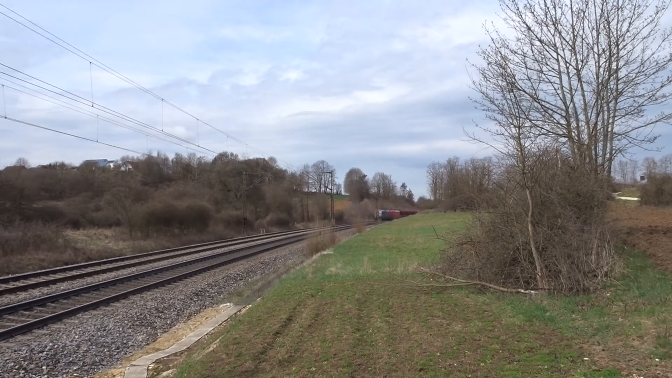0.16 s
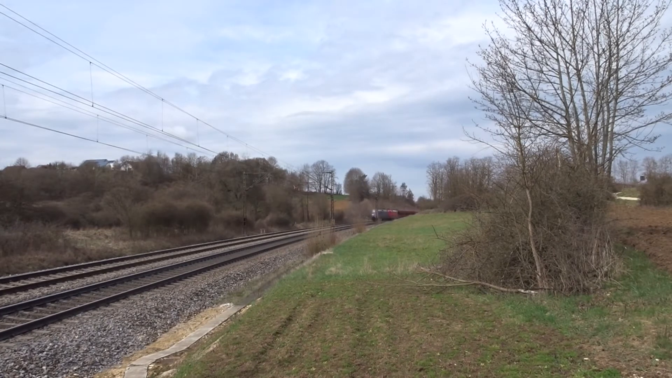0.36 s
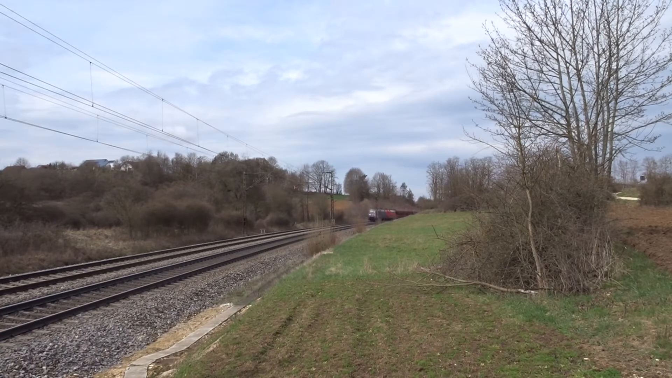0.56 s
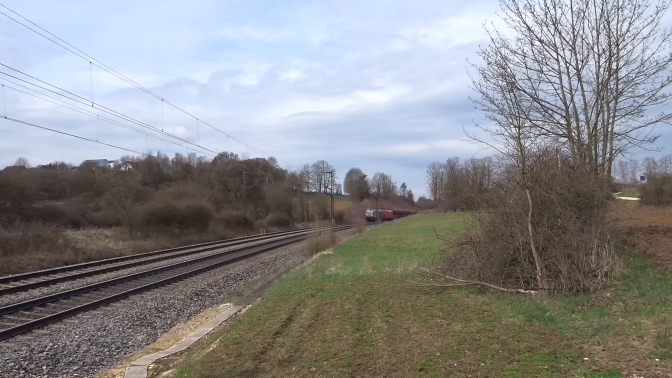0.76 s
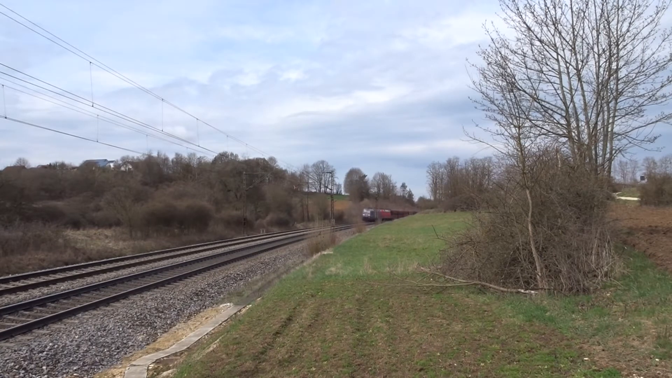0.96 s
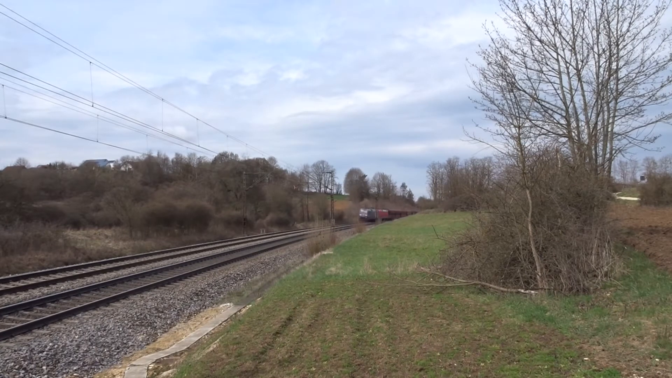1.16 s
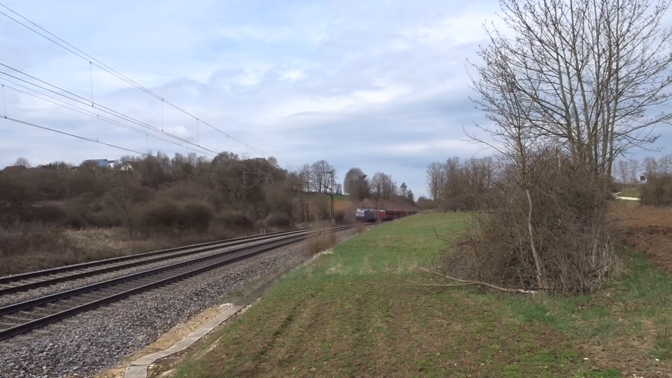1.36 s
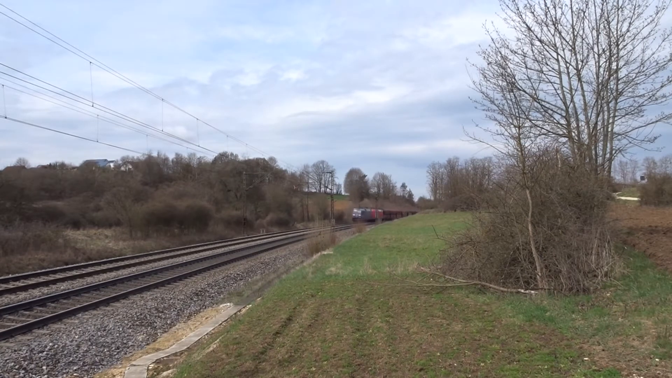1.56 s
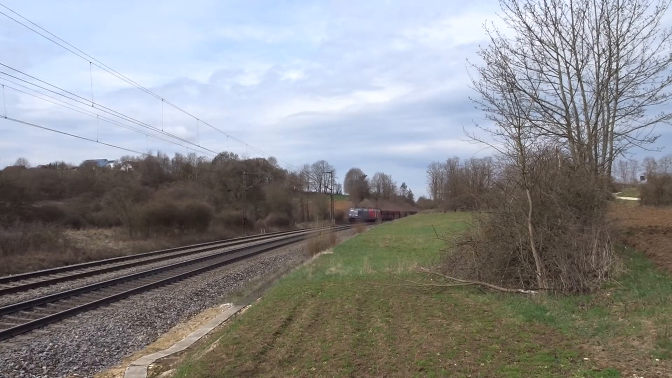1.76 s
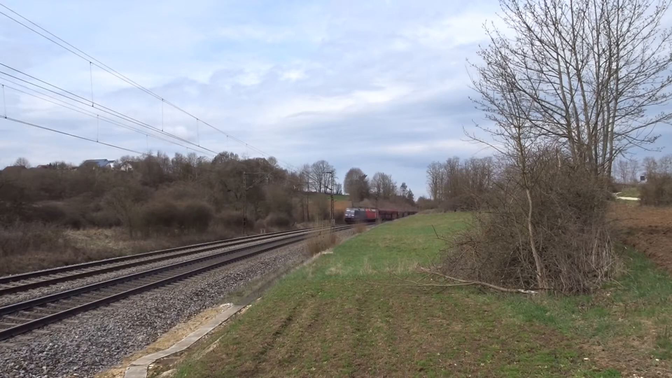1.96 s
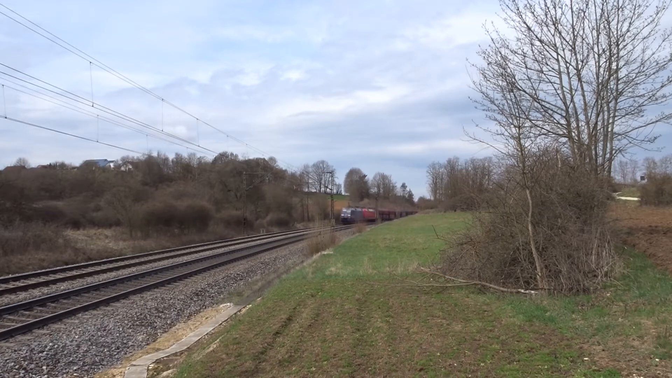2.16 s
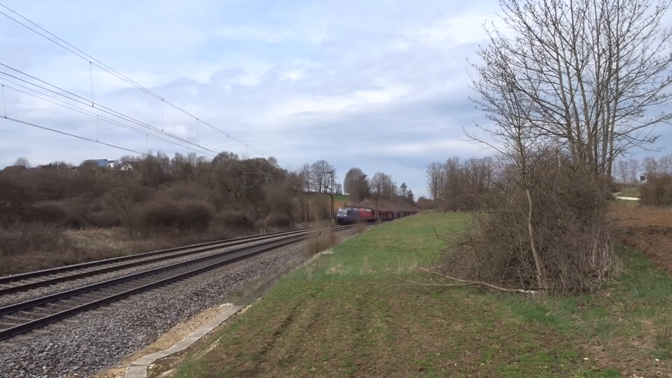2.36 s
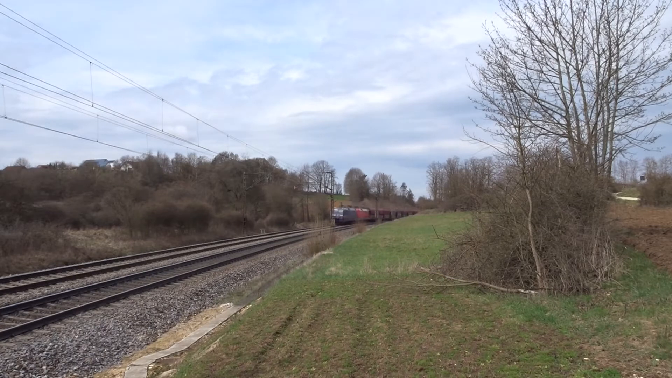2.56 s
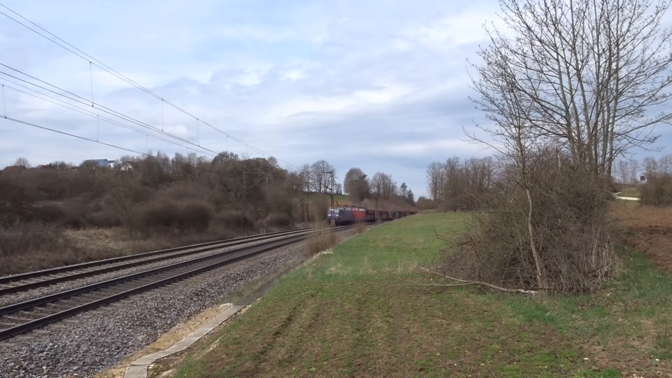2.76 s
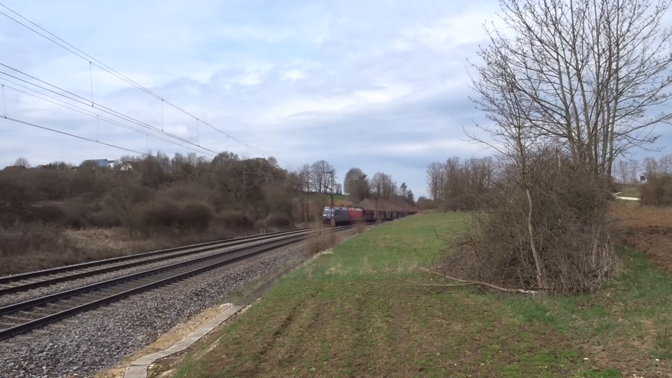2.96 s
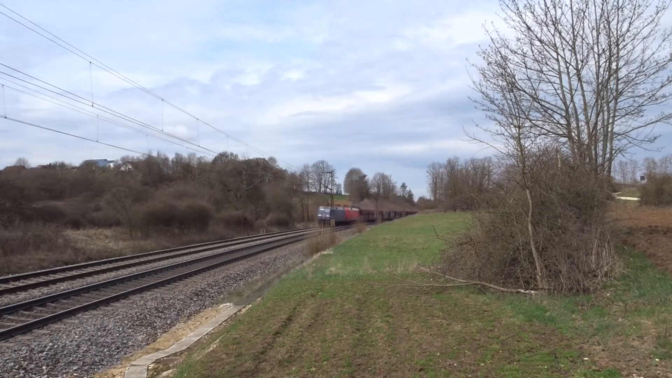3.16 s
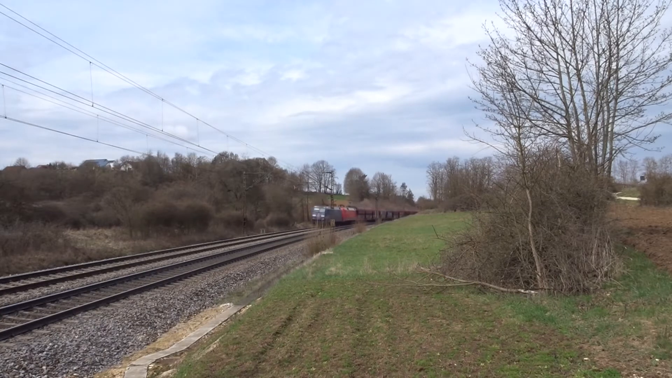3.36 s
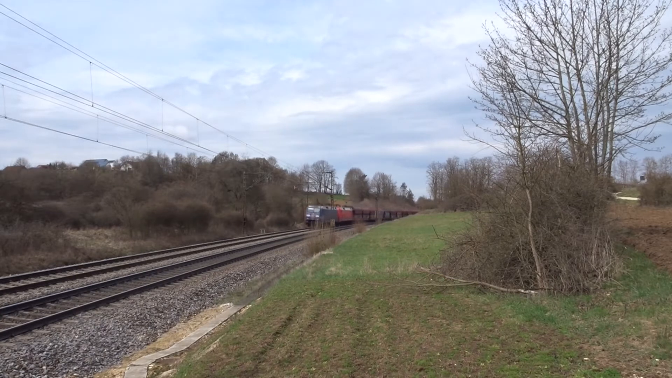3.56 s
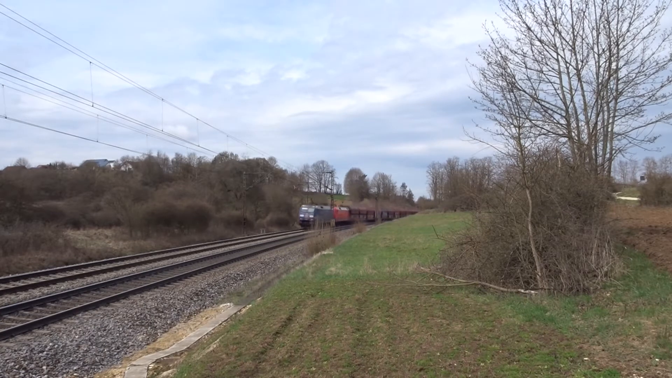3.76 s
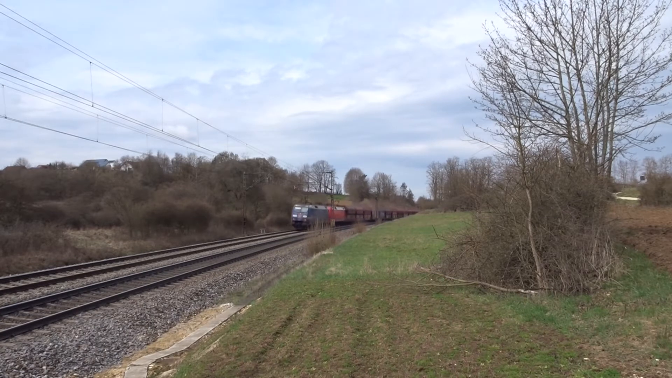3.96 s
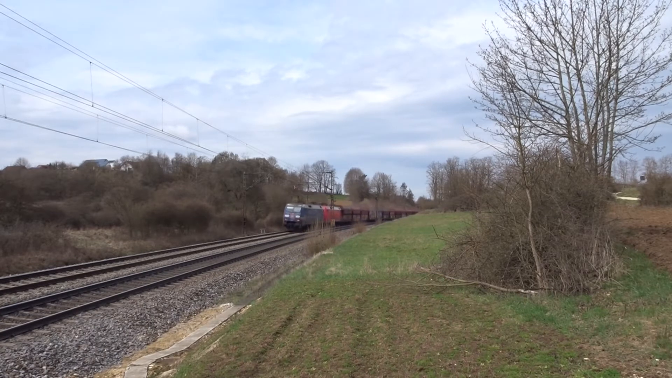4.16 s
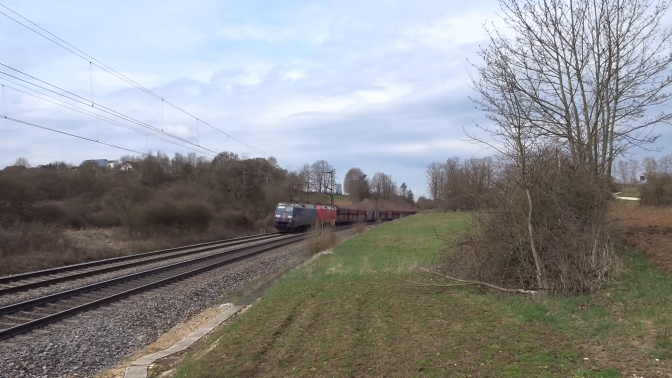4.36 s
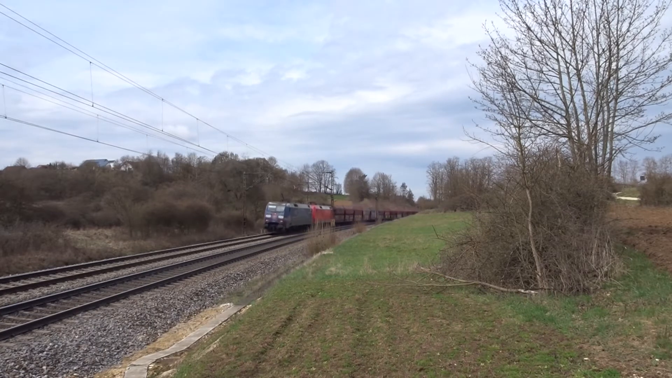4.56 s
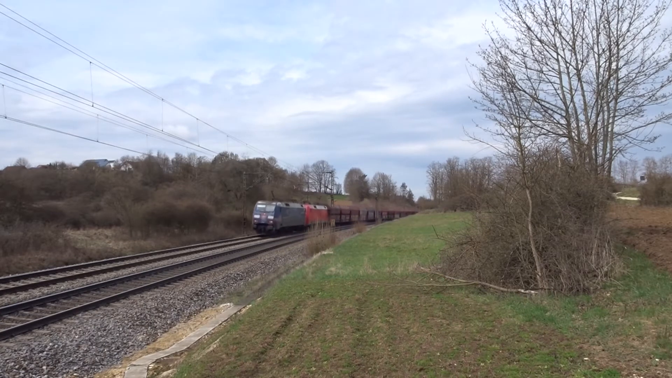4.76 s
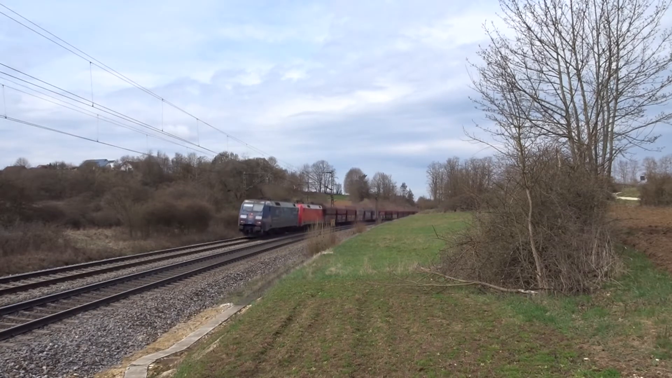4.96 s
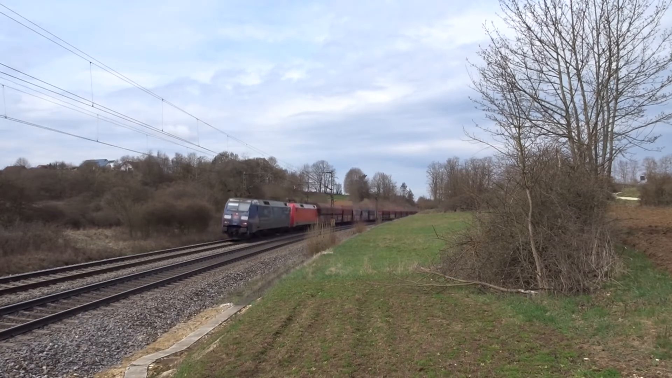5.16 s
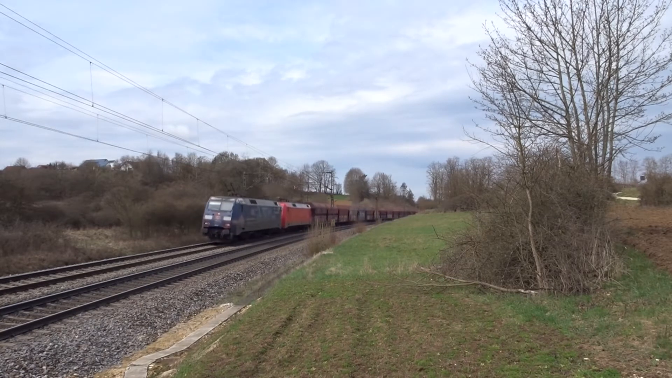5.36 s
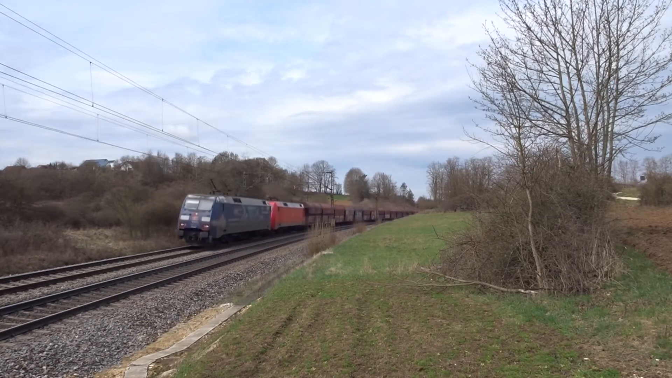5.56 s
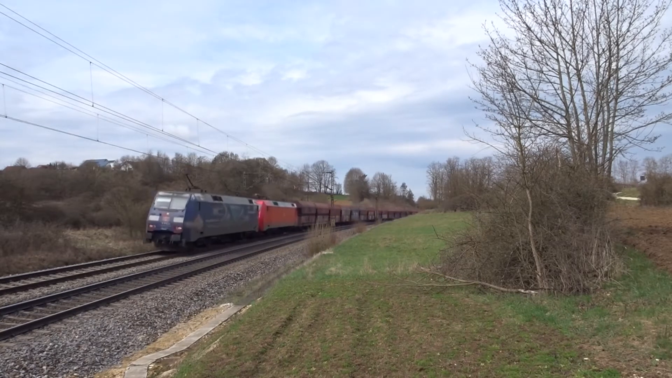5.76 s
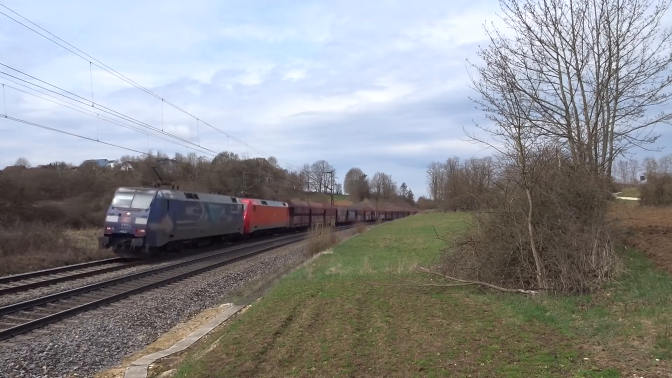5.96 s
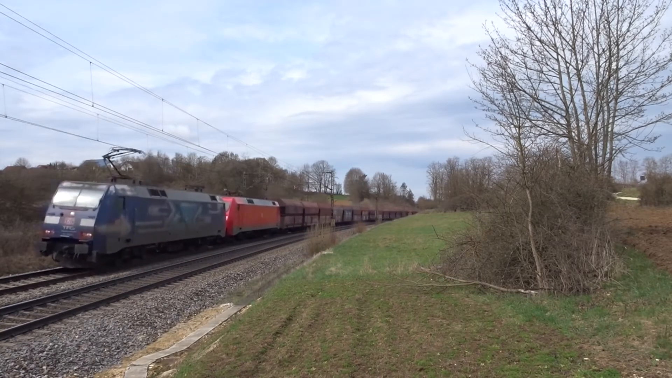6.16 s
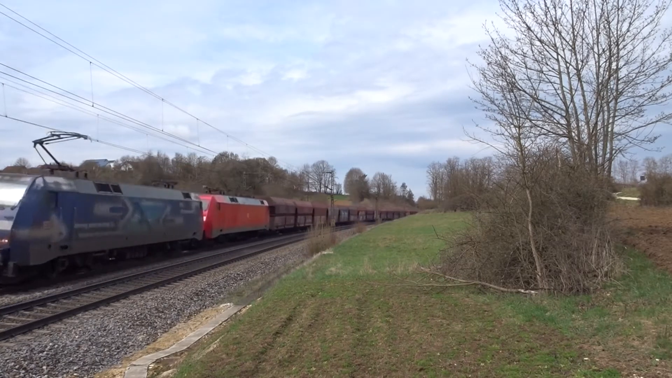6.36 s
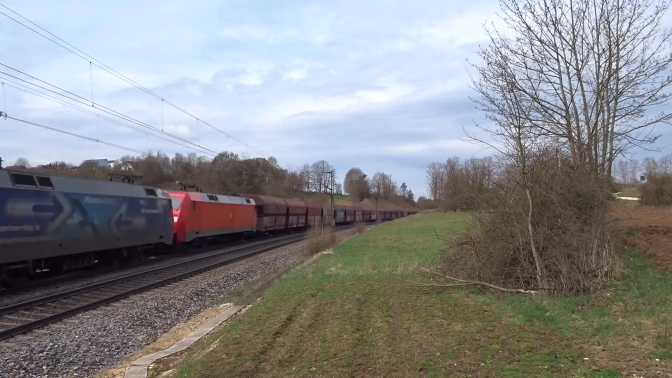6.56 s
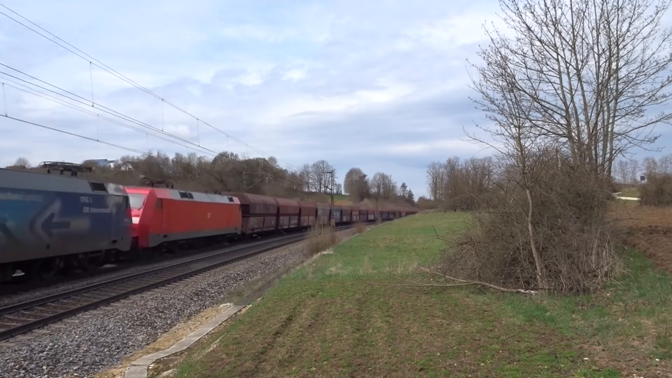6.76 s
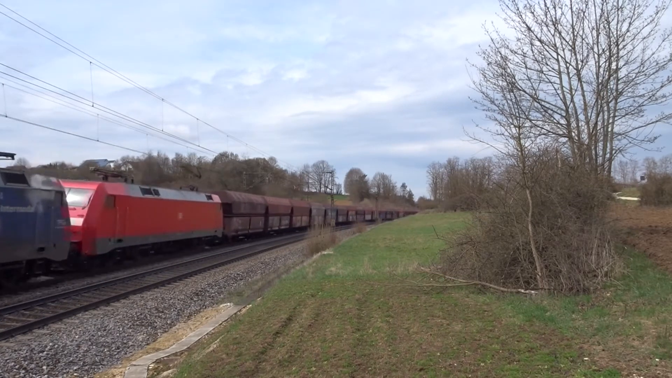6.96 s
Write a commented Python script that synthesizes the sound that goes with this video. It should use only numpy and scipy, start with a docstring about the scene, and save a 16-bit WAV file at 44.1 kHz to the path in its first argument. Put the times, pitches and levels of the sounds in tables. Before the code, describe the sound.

A freight train approaches through open country, its rails singing high and its drive whining before a growing roar, with wind thumping the microphone.

```python
"""High singing in the rails, with puffs of wind thumping on the microphone, then a growing roar:
a freight train behind two electric locomotives comes near in open country. Its sound runs ahead
through the steel, and its drive whines in bursts. Rough wheels shake the track and clack a few times,
power converters hum, and the fans and gears swell and sink in pitch as the locomotives arrive."""
import sys
import numpy as np
from scipy import signal
from scipy.fft import rfft, irfft, next_fast_len
from scipy.io import wavfile
from scipy.ndimage import uniform_filter1d, map_coordinates

SR = 44100
rng = np.random.default_rng(int(sys.argv[2]) if len(sys.argv) > 2 else 0)


def put_to_file(sound):
    """Save the sound as 16-bit audio at rate SR, in the file named by the first command-line argument."""
    columns = np.atleast_2d(sound).T  # one column per channel
    safe = np.clip(columns, -1, 1)
    whole_steps = np.round(safe * 32767)
    wavfile.write(sys.argv[1], SR, whole_steps.astype(np.int16))


N = 308700
SPEED_M_S, SOUND_SPEED_M_S = 25, 343
TRACK_DISTANCE_M, ARRIVAL_S = 10, 7.15  # where and when the front would pass the listener


def amp(db):
    """Turn decibels into a gain."""
    return 10 ** (np.asarray(db) / 20)


def unit(x):
    """Scale a signal to an average strength (rms) of 1."""
    return x / np.sqrt(np.mean(x ** 2) + 1e-20)


def clock():
    """The time of every sample, in seconds."""
    return np.arange(N) / SR


def along(points, hz):
    """Read between (Hz, value) points on a logarithmic frequency scale."""
    freqs, values = np.transpose(points)
    return np.interp(np.log(hz + 1), np.log(freqs + 1), values)


def curve(points):
    """Join (seconds, value) points into one value per sample."""
    return np.interp(clock(), *np.transpose(points))


def wobble(rate):
    """A smooth random curve through `rate` new values a second."""
    return map_coordinates(rng.standard_normal(int(N * rate / SR) + 4), [clock() * rate])


def swells(rows, edge_s):
    """A gain that rises, holds and falls for each (start, length, dB) row."""
    t = clock()
    return sum(amp(db) * np.exp(-(np.maximum(start - t, 0) + np.maximum(t - start - length, 0)) / edge_s)
               for start, length, db in rows)


def filtered(x, response):
    """Shape a sound by a function that gives the gain and phase at each frequency."""
    size = next_fast_len(N + SR // 2)
    return irfft(rfft(x, size) * response(np.fft.rfftfreq(size, 1 / SR)), size)[..., :N]


def colour(points):
    """Turn (Hz, dB) points into a function from frequency to gain."""
    return lambda hz: amp(along(points, hz))


def noise(gain, patchy_db):
    """Stereo noise of strength 1, with randomly louder and softer patches."""
    # Each row: frequency in Hz, how alike left and right are (1 means the same).
    alike = [(60, .993), (500, .97), (1200, .88), (2200, .8), (3300, .58), (5500, .55), (7200, .75),
             (8400, .35), (9800, .82), (11000, .975), (13200, .975), (15000, .8)]
    spectrum = signal.stft(rng.standard_normal((2, N)), nperseg=512)[2]
    patches = uniform_filter1d(rng.standard_normal(spectrum.shape[1:]), size=6, axis=0)
    patches = uniform_filter1d(patches, size=14, axis=1)
    pair = signal.istft(spectrum * amp(patchy_db * unit(patches)), nperseg=512)[1][:, :N]
    spread = lambda hz: np.arccos(np.clip(along(alike, hz), 0, .995)) / 2
    mid, side = filtered(pair, lambda hz: gain(hz) * np.array([np.cos(spread(hz)), np.sin(spread(hz))]))
    return unit(np.array([mid + side, mid - side]))


def tone(pitch_hz, scatter_hz, flutter_db):
    """A tone of strength 1; moving air makes its pitch and loudness waver."""
    phase = 2 * np.pi * np.cumsum(pitch_hz + scatter_hz * wobble(30)) / SR
    return unit(amp(flutter_db * wobble(14)) * np.sin(phase))


def metres_to_go():
    """How far the front of the train still has to roll to pass the listener."""
    return SPEED_M_S * (ARRIVAL_S - clock())


def nearing(growth):
    """The gain of a noise that grows as the train nears, over the steady sound of the far wagons."""
    near_db, reach_m, steepness, far_db = growth
    return np.hypot(amp(near_db) / np.hypot(1, metres_to_go() / reach_m) ** steepness, amp(far_db))


def from_near_rail(hz):
    """Sound from the near rail reaches the two microphone openings with unequal strength and timing."""
    # Each row: frequency in Hz, how far left is ahead of right in radians.
    lead = [(100, 0), (700, .3), (1200, .68), (2700, .8), (4400, 1.6), (5700, 2.45), (7200, 3.65),
            (8400, 5.5), (9800, 2 * np.pi), (16000, 2 * np.pi)]
    # Each row: frequency in Hz, how much louder left is than right in dB.
    balance = [(200, 0), (800, 2), (1200, 6.3), (2400, 3), (5500, .3), (7200, -3.7), (8500, -2.6),
               (9800, 0)]
    half = np.array([[.5], [-.5]])
    return amp(half * along(balance, hz)) * np.exp(1j * half * along(lead, hz))


def from_train(x, lag_s=0.0001):
    """As the train swings to the left, its sound reaches the left opening earlier and stronger."""
    # The microphone's housing shades the far side.
    # Each row: frequency in Hz, share gained on the left and lost on the right with the train alongside.
    shadow = [(100, 0), (500, 0.24), (900, 0.31), (2000, 0.44), (4500, 0.18)]
    leftness = TRACK_DISTANCE_M / np.hypot(metres_to_go(), TRACK_DISTANCE_M)
    sides = np.array([[1], [-1]]) * leftness
    shaded = x + sides * filtered(x, lambda hz: along(shadow, hz))
    return np.array([map_coordinates(channel, [(clock() + side * lag_s / 2) * SR])
                     for channel, side in zip(shaded, sides)])


def wind(apart_db=-6.5):
    """Puffs flutter a little differently left and right; the strongest eddies are push-pull thumps."""
    # Each row: start in seconds, length in seconds, level in dB.
    puffs = [(.15, 0.16, -31), (0.578, 0.17, -31.5), (.8, 0.13, -28), (1.065, 0.069, -28),
             (1.58, 0.28, -43), (4.567, .04, -31), (5.403, .22, -37), (5.82, .3, -31)]
    # Each row: frequency in Hz, relative level in dB.
    flutter = [(20, -32), (45, -8), (80, -3.5), (150, -3.5), (240, -12.5), (380, -28), (900, -55),
               (3000, -90)]
    # Each row: time in seconds, peak level in dB, pitch in Hz.
    thumps = [(.177, -16, 100), (.268, -16, 240), (.327, -17, 150), (.578, -22, 190), (1.102, -22, 150),
              (1.135, -23, 130)]
    shared, apart = filtered(rng.standard_normal((2, N)), colour(flutter))
    out = swells(puffs, edge_s=0.028) * unit(shared + amp(apart_db) * np.array([apart, -apart]))
    for when, db, hz in thumps:
        phase = 2 * np.pi * hz * (clock() - when)
        out -= amp(db) * phase * np.exp((1 - phase ** 2) / 2)
    return out


def converters(hum_hz=795, lower_hz=765, beat_hz=43):
    """The power converters hum on two close notes, roughened by a beat."""
    # The upper note. Each row: time in seconds, level in dB.
    hum_levels = [(0, -49.5), (2.7, -52), (4.2, -47.5), (4.6, -38), (4.95, -40), (5.15, -31.5), (5.65, -42),
                  (6.3, -31.5), (7, -40)]
    beat = 1 + .25 * tone(beat_hz, scatter_hz=3, flutter_db=3)
    upper = amp(curve(hum_levels)) * tone(hum_hz, scatter_hz=3.37, flutter_db=0.5)
    lower = amp(-51) * tone(lower_hz, scatter_hz=8, flutter_db=3)
    return beat * (upper + lower)


def drive_whine(beat_hz=44, between_bursts_db=-51.5):
    """The electric drive whines in a beating pair of tones, which come and go together."""
    # The main tone. Each row: time in seconds, pitch in Hz.
    pitches = [(0, 1197), (1, 1218), (2.4, 1210), (4.2, 1203), (6.1, 1201), (7, 1222)]
    # The upper tone. Each row: time in seconds, level in dB compared with the main tone.
    upper_levels = [(1, -27), (2.7, -5), (4, -2.5), (7, -11.5)]
    # Each row: start in seconds, length in seconds, level in dB.
    bursts = [(0, .13, -43.5), (.39, .16, -44.5), (.64, 0.09, -41.5), (.85, 0.082, -39), (1.01, .15, -40),
              (1.38, 0.35, -41.5), (1.87, 0.034, -39.5), (2, 0.43, -42), (2.5, 0.19, -35),
              (2.81, 0.286, -41), (3.28, 0.15, -43), (3.5, 0.027, -34.5), (3.64, 0.18, -35.5),
              (4.04, .38, -38.5), (4.56, .3, -46), (5.04, 0.23, -33), (5.35, 0.36, -38.5),
              (5.86, 0.17, -31), (6.12, 0.091, -32.5), (6.27, 0.24, -42), (6.54, 0.1, -31.5),
              (6.76, .24, -44)]
    pitch_hz = curve(pitches)
    main = tone(pitch_hz, scatter_hz=3.03, flutter_db=1.9)
    upper = amp(curve(upper_levels)) * tone(pitch_hz + beat_hz, scatter_hz=2.79, flutter_db=4)
    return (swells(bursts, edge_s=0.019) + amp(between_bursts_db)) * (main + upper)


def wheel_clacks(fade_s=.06):
    """Wheels knock on the rail in a few short, bright clacks."""
    # Each row: start in seconds, level in dB.
    knocks = [(4.36, -32), (4.697, -26), (4.818, -23), (4.833, -26.5), (5.152, -22), (5.49, -21)]
    t = clock()
    blows = sum((t >= start) * amp(db - 60 * np.abs(t - start) / fade_s) for start, db in knocks)
    return blows * noise(colour([(800, -14), (2500, -6), (5200, -12), (9000, -28)]), patchy_db=0)


def rail_ring():
    """The rail bends between its sleepers (the cross beams under it) in a broad, hollow ring."""
    # Each row: frequency in Hz, relative level in dB.
    ring = [(500, -22), (850, -13), (1040, 3.5), (1230, 5.5), (1400, 1), (1700, -17.5), (3000, -31.5),
            (6000, -70)]
    # In order: level alongside in dB, reach in metres, steepness beyond that, level far away in dB.
    growth = (-31, 62, 1.56, -55)
    return nearing(growth) * noise(colour(ring), patchy_db=0.5)


def rail_song(surge_share=0.28, hiss_full_m=31, hiss_loss_db_per_m=0.42):
    """Only a few ringing waves carry far along the steel; hiss fills in between as the wheels near."""
    # The rail's high resonances. Each row: pitch in Hz, width in Hz, relative level in dB.
    resonances = [(5520, 320, -11), (6925, 630, -3), (7270, 530, -1.5), (9100, 100, -28.5),
                  (9570, 230, -13), (10180, 280, -24), (10917, 410, -3), (11260, 260, -9.5),
                  (12160, 660, -1), (12560, 370, 1), (13000, 870, -2.5), (13550, 600, -14),
                  (14350, 560, -14.5), (15100, 700, -11.5), (15600, 700, -10.5)]
    # The sharpest ones, heard as thin whistles, with the same columns.
    whistles = [(7534, 70, -1), (11212, 50, -4), (11762, 50, -6), (12280, 50, 0), (12779, 55, 1)]
    # Each row: time in seconds, relative level of the singing in dB.
    singing = [(0.0, -42), (0.27, -40), (0.39, -44.5), (0.56, -39), (0.86, -37.5), (0.94, -33.5),
               (1.25, -37.5), (1.3, -32.5), (1.93, -37.5), (2.63, -33.5), (2.77, -48), (2.79, -37),
               (2.92, -29), (3.61, -32), (3.8, -28.5), (4.25, -32), (4.46, -25), (5.11, -29.5), (5.46, -26),
               (6.22, -25.5), (6.26, -27.5), (6.78, -25), (6.82, -35), (7.0, -27)]
    # Each row: frequency in Hz, relative level in dB.
    hiss_shape = [(1500, -43.5), (3200, -7.5), (4900, -6.5), (5600, -1), (6100, .5), (7200, 2), (7900, -2),
                  (8800, -1), (9300, -3.5), (10200, -3), (11600, -2), (12800, -8.5), (15800, -12.5)]
    # The highest waves surge fully; lower waves and hiss follow only a share of each surge.
    surging_db = curve(singing)
    trend_db = uniform_filter1d(surging_db, size=SR, mode="nearest")
    calm_db = trend_db + surge_share * (surging_db - trend_db)
    peaks = lambda hz: np.sqrt(sum((amp(db) / (1 + (2 * (hz - pitch) / width) ** 2) ** 2) ** 2
                                   for pitch, width, db in resonances + whistles))
    # Many close resonances ripple each band into thin lines.
    grain = rng.standard_normal(1024)
    ripple = lambda hz, spacing_hz=28: amp(1.5 * map_coordinates(grain, [hz / spacing_hz], mode="wrap"))
    shimmer_db = .9 * wobble(20) + .4 * wobble(60)
    song = amp(1.5) * noise(lambda hz: peaks(hz) * ripple(hz), patchy_db=0.3)
    high = filtered(song, lambda hz: hz > 10500)
    loss_db = hiss_loss_db_per_m * np.maximum(metres_to_go() - hiss_full_m, 0)
    hiss = amp(9 - loss_db) * noise(lambda hz: colour(hiss_shape)(hz) * ripple(hz), patchy_db=1.2)
    # Song and hiss share the strength that the rail carries.
    share = 1 / np.hypot(1, amp(-0.5 - loss_db))
    return amp(shimmer_db) * share * (amp(surging_db) * high + amp(calm_db) * (song - high + hiss))


def fans_and_gears():
    """Each swells as its grille comes into view, and sinks in pitch as it closes in more slowly."""
    # Each row: pitch at rest in Hz, time alongside in seconds, loudest time in seconds,
    # swell length in seconds, level in dB, pitch waver in Hz.
    machines = [(229.5, 7.4, 6.75, .4, -29, 3), (381.5, 7.3, 6.6, .2, -30.5, 3),
                (712, 7.7, 6.4, .4, -36, 3), (724, 7.7, 6.95, .17, -27.5, 8), (757, 7.5, 6.6, .25, -35, 6),
                (1483, 7.1, 6.6, .24, -33.5, 2), (1447, 7.7, 6.9, .13, -29.5, 9),
                (1908, 7.15, 6.55, .4, -31, 2), (1858, 7.4, 6.9, .14, -30.5, 4),
                (2200, 7.15, 6.55, .3, -42, 4), (2436, 7.05, 6.45, .5, -34, 2)]
    t, out = clock(), np.zeros(N)
    for rest_hz, alongside_s, loudest_s, length_s, db, scatter_hz in machines:
        away_m = SPEED_M_S * (alongside_s - t)
        closing_m_s = SPEED_M_S * away_m / np.hypot(away_m, TRACK_DISTANCE_M)
        heard_hz = rest_hz / (1 - closing_m_s / SOUND_SPEED_M_S)  # the Doppler effect
        swell = amp(db) / np.hypot(1, (t - loudest_s) / length_s) ** 1.4
        out += swell * tone(heard_hz, scatter_hz, flutter_db=1.6)
    return out


def rolling():
    """Rough wheels make the ground rumble, the sleepers roar and the wheels themselves rush."""
    # The tone colour of each noise. Each row: frequency in Hz, relative level in dB.
    rumble = [(18, -28), (30, -6), (42, -2), (75, 0.5), (120, -6), (200, -14.5), (400, -37), (1000, -80)]
    roar = [(60, -60), (130, -5.5), (180, -2), (245, 1.5), (340, -4), (450, -3.5), (560, 2), (630, -2),
            (790, 3), (900, -1.5), (1300, -16), (4000, -62)]
    rush = [(600, -33), (1400, -3.5), (1560, 2.5), (1750, -3.5), (2000, 0), (2400, 0.5), (3000, -5),
            (4200, -10.5), (5000, -15), (6400, -15), (8000, -46), (12000, -62)]
    # Each lists: level alongside in dB, reach in metres, steepness beyond that, level far away in dB.
    rumble_growth = (-31.5, 37, 2, -47)
    roar_growth = (-22, 24, 1.72, -43)
    rush_growth = (-20, 15, 1.18, -51)
    ground = nearing(rumble_growth) * noise(colour(rumble), patchy_db=1.15)
    sleepers = nearing(roar_growth) * noise(colour(roar), patchy_db=0.57)
    wheels = nearing(rush_growth) * noise(colour(rush), patchy_db=0.74)
    return ground + sleepers + wheels


def scene():
    """Part of the train's sound comes through the air; part runs ahead and leaves the near rail."""
    through_air = from_train(rolling() + converters() + fans_and_gears() + wheel_clacks())
    through_rail = filtered(rail_ring() + rail_song() + drive_whine(), from_near_rail)
    return through_air + through_rail + wind()


def record(dry):
    """The very highest treble is cut off."""
    return filtered(dry, lambda hz: hz < 15780)


dry = scene()
out = record(dry)
put_to_file(out)
```